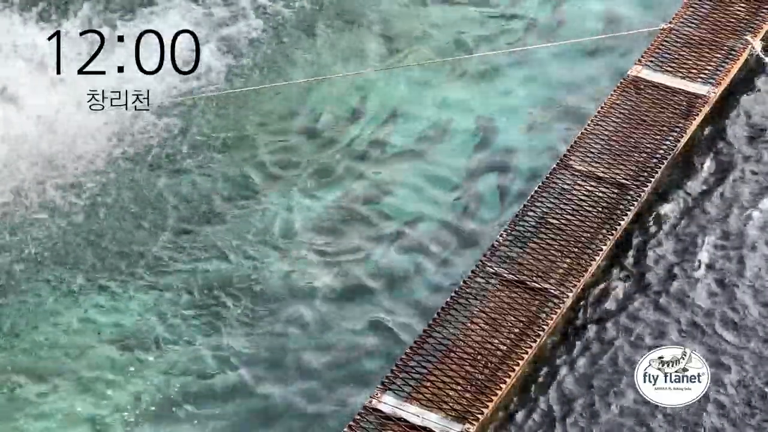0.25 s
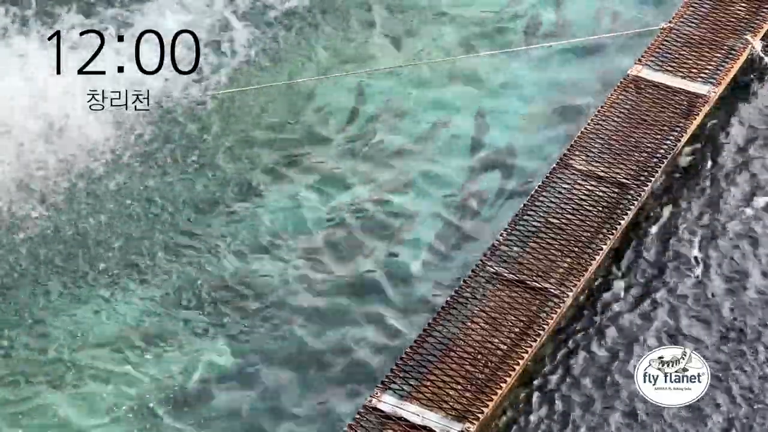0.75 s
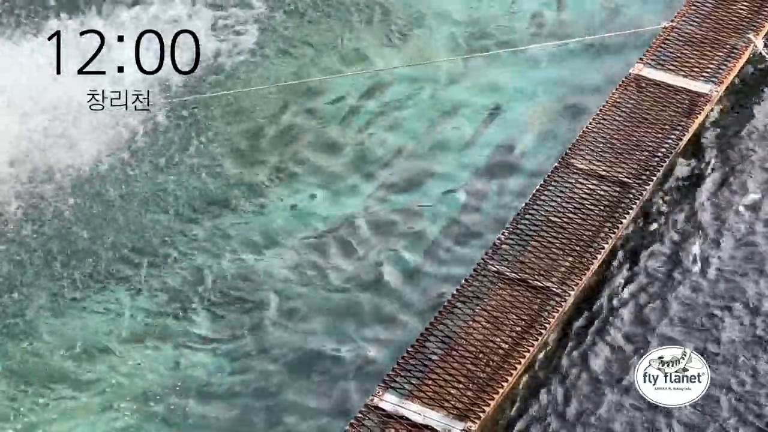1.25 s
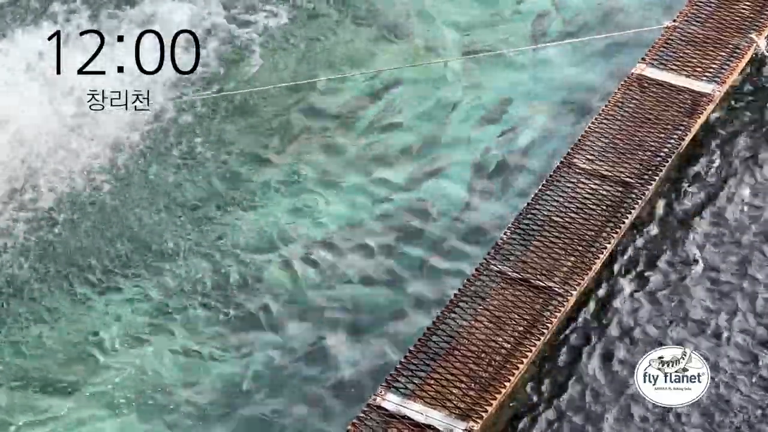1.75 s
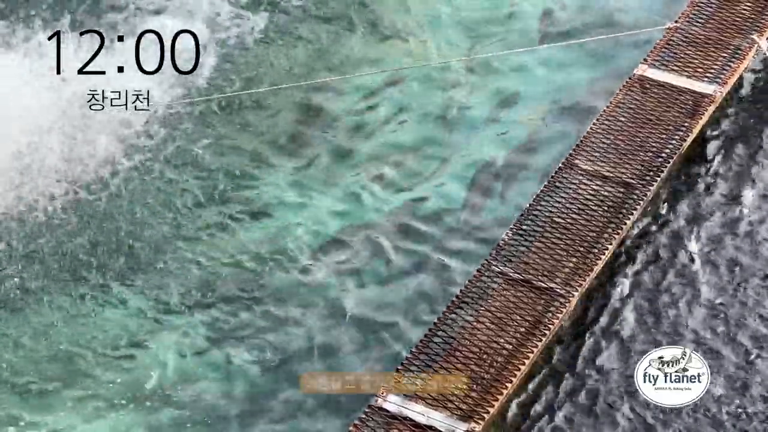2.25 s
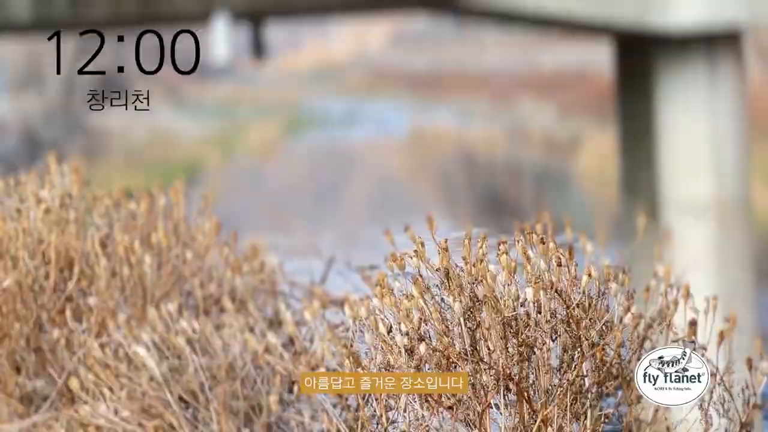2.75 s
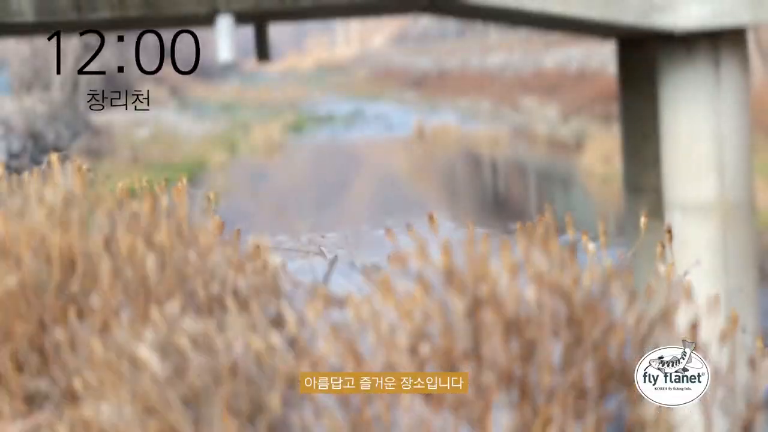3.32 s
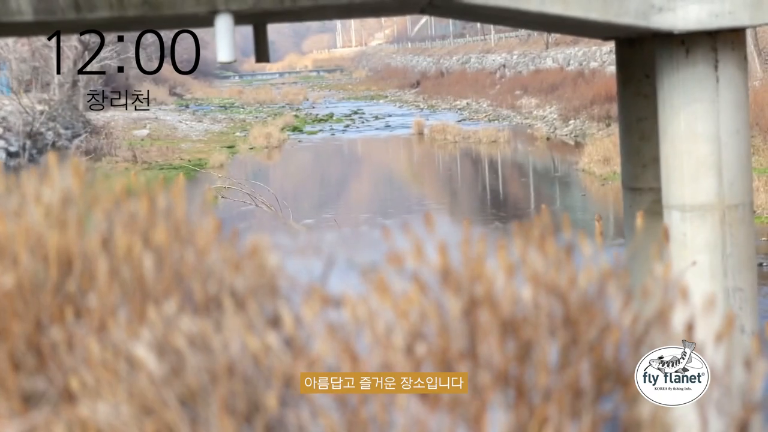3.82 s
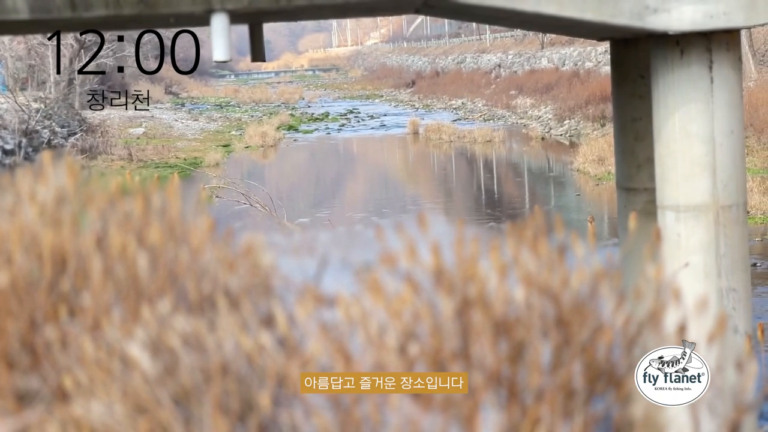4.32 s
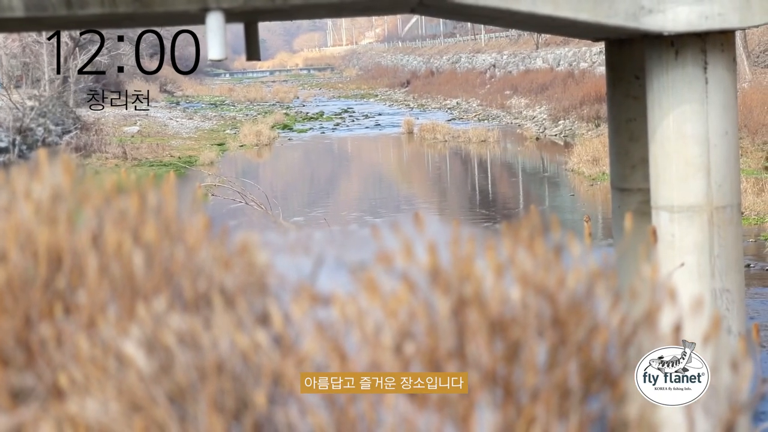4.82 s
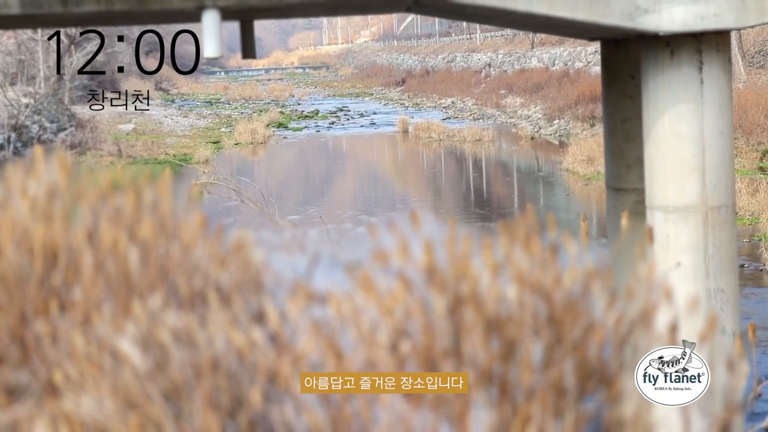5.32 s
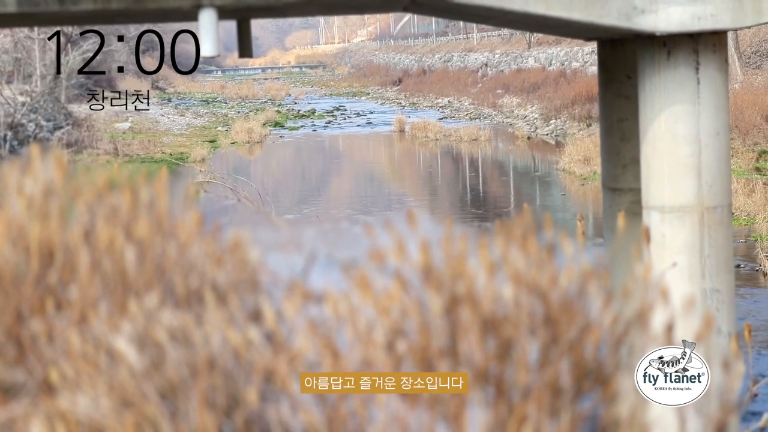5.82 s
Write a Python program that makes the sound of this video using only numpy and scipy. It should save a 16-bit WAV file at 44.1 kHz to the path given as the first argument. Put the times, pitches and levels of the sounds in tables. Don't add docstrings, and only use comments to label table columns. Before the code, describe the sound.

Close at the bank, paddlewheel blades churn water into a dense, bright rush of splashes, bubbles and hissing spray over a low pulsing motor hum. A very brief gap interrupts it. Then the sound fades smoothly to the same wheels far outdoors, where water becomes a soft dull wash and the low drone stands out.

```python
import sys
import numpy as np
from scipy import signal
from scipy.fft import rfft, irfft, next_fast_len
from scipy.io import wavfile
from scipy.ndimage import uniform_filter1d, map_coordinates

SR = 44100
rng = np.random.default_rng(int(sys.argv[2]) if len(sys.argv) > 2 else 0)


def to_wav(sig):
    pcm = np.clip(np.atleast_2d(sig), -1, 1) * 32767
    pcm = np.round(pcm).astype(np.int16)
    wavfile.write(sys.argv[1], SR, pcm.T)


def ratio_of_db(decibels):
    return 10 ** (np.asarray(decibels, float) / 20)


N = 267679
T = np.arange(N) / SR

# (frequency [Hz], density [dB per Hz])
WASH_SPECTRUM = [(25, -29), (50, -7.5), (65, 1), (95, 3), (130, -4.5), (250, -9), (500, -11), (1000, -10.5),
                 (1500, -24), (3000, -43.5)]
# (frequency [Hz], density [dB per Hz])
HISS_SPECTRUM = [(800, -12.5), (1500, 0), (3000, -3.5), (5000, -11), (8000, -11.5), (10000, -17.5),
                 (12000, -17), (14000, -42), (15700, -47)]
# (frequency [Hz], gain [dB])
FAR_TOP = [(14000, 0), (14800, -1), (15700, -5)]
# (multiple of the pulse rate [1], level [dB rms])
FAR_MOTOR = [(1, -18), (2, -36), (3, -38.5), (4, -43)]
# (frequency [Hz], density [dB per Hz])
CHURN_SPECTRUM = [(25, -39), (50, -8), (90, -0.5), (200, -5.5), (350, -0.5), (600, -6.5), (1200, -4),
                  (2800, -8.5), (5000, -16), (9000, -21.5)]
# (frequency [Hz], density [dB per Hz])
SPRAY_SPECTRUM = [(1500, -43), (3000, -1), (5500, -3.5), (7500, 1), (10000, -3), (12500, -4), (15000, -14),
                  (15700, -28)]
# (multiple of the pulse rate [1], level [dB rms])
NEAR_MOTOR = [(1, -19.5), (2, -38), (3, -40.5), (4, -45)]
# (frequency [Hz], left-right likeness [1])
FAR_ALIKE = [(60, 0.9), (150, 0.99), (300, 0.4), (700, 0.68), (1100, 0.31), (2000, 1), (4000, 0.92),
             (15000, 1)]
# (frequency [Hz], left-right likeness [1])
NEAR_ALIKE = [(60, 0.74), (150, 0.9), (300, 1), (700, 0.87), (1300, 0.92), (2000, 1), (4000, 0.97),
              (15000, 0.99)]
# (frequency [Hz], phase [rad])
FAR_LEAD = [(60, 1.15), (400, 0.96), (900, 1.46), (1200, 0.18), (1600, 0.017), (2000, 0)]
# (frequency [Hz], phase [rad])
NEAR_LEAD = [(60, -0.72), (400, -0.23), (900, -0.8), (1600, -0.37), (2000, -0.045)]
# (frequency [Hz], phase [half turns])
PORT_LEAD = [(2500, 0), (3100, .22), (4800, .16), (5400, 0), (5900, -.26), (6500, 0), (7300, 0),
             (8800, -.5), (9750, -1), (10350, -1), (12300, -1.68), (13100, -2), (14000, -2), (15700, -2.62)]
# (time [s], level [dB])
SURGES = [
    (.62, .5),
    (1.37, 1),
    (1.75, 1),
    (2.14, .5),
    (3.3, 1),
    (3.81, 1),
    (4.49, 1.5),
    (5.17, .5),
    (5.51, 2),
]
# (start [s], end [s])
FADE = (2.21, 3.245)

CHURN_DB, SPRAY_DB, WASH_DB, HISS_DB = -19, -23, -29, -38
SURGE_S = 0.06
SPRAY_FOLLOWS, HISS_FOLLOWS = 0.43, 0.1
CREST_S = 2.7358
DROPOUT_S, CATCH_UP_S, BLOCK = 1.3855, 1.494, 1024


def unit(x):
    return x / np.sqrt(np.mean(x ** 2) + 1e-20)


def along(points, hz):
    f, v = np.transpose(points)
    return np.interp(np.log(hz + 1), np.log(f + 1), v)


def wobble(rate):
    coarse = T[::128]
    knots = rng.standard_normal(400)
    return np.interp(T, coarse, map_coordinates(knots, [coarse * rate]))


def filtered(x, response):
    m = next_fast_len(N + 8192)
    hz = np.fft.rfftfreq(m, 1 / SR)
    return irfft(rfft(x, m) * response(hz), m)[..., :N]


def motor(hz, orders, shake_db, drift):
    angle = 2 * np.pi * hz * (T - CREST_S) + drift * wobble(4.96)
    drone = np.zeros(N)
    for k, db in orders:
        size = np.sqrt(2) * ratio_of_db(db + k * shake_db * wobble(9))
        drone += size * np.cos(k * angle)
    return drone


def rush(spectrum, patchy_db):
    z = signal.stft(rng.standard_normal((2, N)), nperseg=512)[2]
    field = uniform_filter1d(rng.standard_normal(z.shape[1:]), size=8, axis=0)
    field = uniform_filter1d(field, size=8, axis=1)
    pair = signal.istft(z * ratio_of_db(patchy_db * unit(field)), nperseg=512)[1][:, :N]
    return unit(filtered(pair, lambda hz: ratio_of_db(along(spectrum, hz))))


def slaps(decay_s, spread_db, count):
    when, luck = rng.random((count, 2)).T
    size = ratio_of_db(-spread_db * np.log(1 - luck))
    hits = np.bincount((when * (N - 1)).astype(int), size, N)
    t = T[:SR // 4]
    slap = np.exp(-t / decay_s) * (1 - np.exp(-t / 0.0015))
    return unit(signal.fftconvolve(hits, slap)[:N])


def bubbles(hz, octaves, cycles, spread_db, count, size):
    when, luck = rng.random((count, 2)).T
    pitch = np.clip(hz * 2 ** (octaves * rng.standard_normal(count)), 250, 15000)[:, None]
    step = np.arange(size)
    turns = pitch * step / SR
    life = np.minimum(cycles, pitch * size / 4 / SR)
    rings = np.sin(2 * np.pi * turns * (1 + 0.039 * turns / life))
    rings *= np.exp(-turns / life) * (1 - np.exp(-2 * turns))
    rings *= ratio_of_db(-spread_db * np.log(1 - luck))[:, None]
    rings *= (1 - step / size) ** 2
    at = (when * N).astype(int)[:, None] + step
    return unit(np.bincount(at.ravel(), rings.ravel(), N + size)[:N])


def surge_db():
    return sum(db * np.exp(-((T - s) / SURGE_S) ** 2) for s, db in SURGES)


def ports(pair, alike, lead):
    def shares(hz):
        turn = np.arccos(np.clip(along(alike, hz), -1, 1)) / 2
        return np.array([np.cos(turn), np.sin(turn)])

    direct, scattered = filtered(pair, shares)
    sides = np.array([direct + scattered, direct - scattered])
    angles = lead + [(hz, np.pi * half_turns) for hz, half_turns in PORT_LEAD]
    return filtered(sides, lambda hz: np.exp(0.5j * np.outer([1, -1], along(angles, hz))))


def far_off():
    beat = slaps(0.014, 1.5, count=300)
    wash = rush(WASH_SPECTRUM, patchy_db=0.3) * ratio_of_db(0.26 * wobble(11))
    hiss = rush(HISS_SPECTRUM, patchy_db=0.6) * unit(1 + 0.1 * beat)
    hiss[0] += ratio_of_db(-18) * bubbles(2200, 0.49, 3, 1.5, count=5000, size=64) * beat
    water = ratio_of_db(WASH_DB + surge_db()) * wash
    water += ratio_of_db(HISS_DB + HISS_FOLLOWS * surge_db() + 0.3 * wobble(6)) * hiss
    water = filtered(water, lambda hz: ratio_of_db(along(FAR_TOP, hz)))
    drone = motor(74.71, FAR_MOTOR, 0.43, 0.04)
    drone += ratio_of_db(-37) * np.sin(2 * np.pi * 77.25 * T)
    drone += ratio_of_db(-48.5 + 1.1 * wobble(3.6)) * np.sin(2 * np.pi * 118.9 * T)
    return ports(water, FAR_ALIKE, FAR_LEAD) + drone * ratio_of_db([[-1.05], [1.05]])


def close_by():
    beat = slaps(0.014, 1.5, count=300)
    churn = rush(CHURN_SPECTRUM, patchy_db=-0.02) * ratio_of_db(0.79 * wobble(14))
    churn[0] += ratio_of_db(-11.0) * bubbles(1200, 0.93, 2.4, 2, count=2500, size=200)
    spray = rush(SPRAY_SPECTRUM, patchy_db=0.6) * unit(1 + 0.12 * beat)
    spray[0] += ratio_of_db(-15.0) * bubbles(10500, 0.75, 2.7, 1.7, count=9000, size=40) * beat
    water = ratio_of_db(CHURN_DB + surge_db()) * churn * unit(1 + 0.055 * beat)
    water += ratio_of_db(SPRAY_DB + SPRAY_FOLLOWS * surge_db() + 0.3 * wobble(7.2)) * spray
    water[0] += ratio_of_db(-35.5 + 3 * surge_db()) * bubbles(352, 0.2, 6, 2, count=500, size=1600)
    drone = motor(74.77, NEAR_MOTOR, 0.41, 0.061)
    drone -= ratio_of_db(-30) * np.cos(2 * np.pi * 77.37 * (T - CREST_S + 0.0015))
    drone += ratio_of_db(-32 + 1.5 * wobble(3.5)) * np.sin(2 * np.pi * 118.9 * T)
    drone += ratio_of_db(-44.0 + 2.4 * wobble(3.4)) * np.sin(2 * np.pi * 720 * T)
    return ports(water, NEAR_ALIKE, NEAR_LEAD) + drone * ratio_of_db([[-0.6], [0.6]])


def scene():
    turn = np.interp(T, FADE, [0, np.pi / 2])
    half_cycle = round(SR / 74.78 / 2)
    near = np.roll(close_by(), half_cycle, axis=1)
    return np.cos(turn) * near + np.sin(turn) * far_off()


def low_pass(x):
    return signal.sosfilt(signal.butter(12, 16520, fs=SR, output="sos"), x)


def record(dry):
    start, end = round(DROPOUT_S * SR), round(CATCH_UP_S * SR)
    late = dry.copy()
    late[:, start + BLOCK:end] = dry[:, start:end - BLOCK]
    dying = ratio_of_db(-30 - 5000 * T[:BLOCK])
    late[:, start:start + BLOCK] = dry[:, start:start + BLOCK] * dying
    mix = filtered(late, lambda hz: (hz > 12) & (hz < 15730))
    return low_pass(mix)


dry = scene()
out = record(dry)
to_wav(out)
```